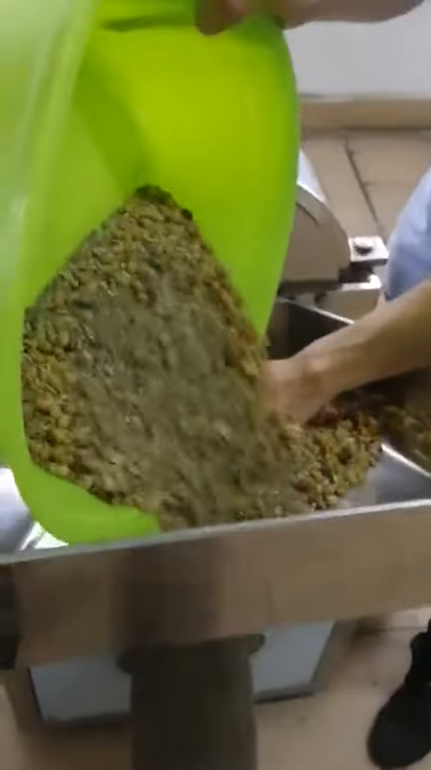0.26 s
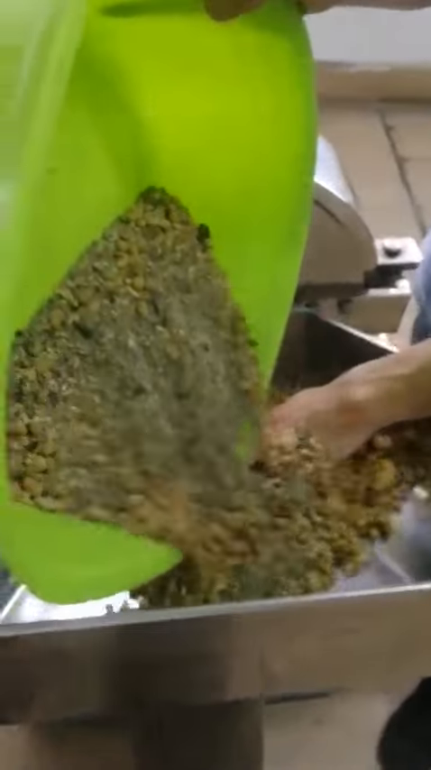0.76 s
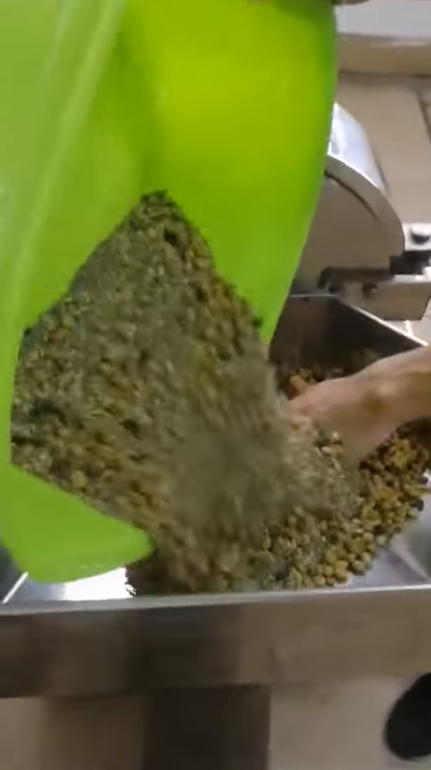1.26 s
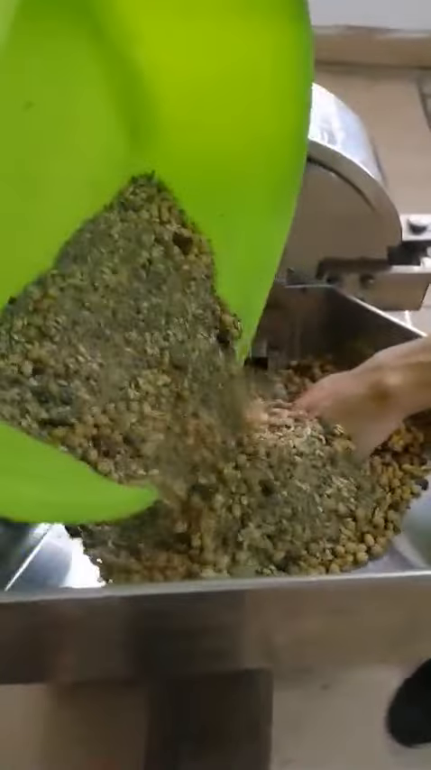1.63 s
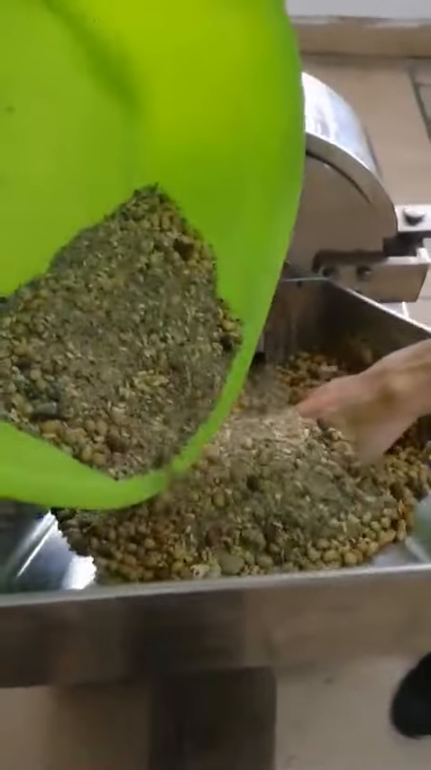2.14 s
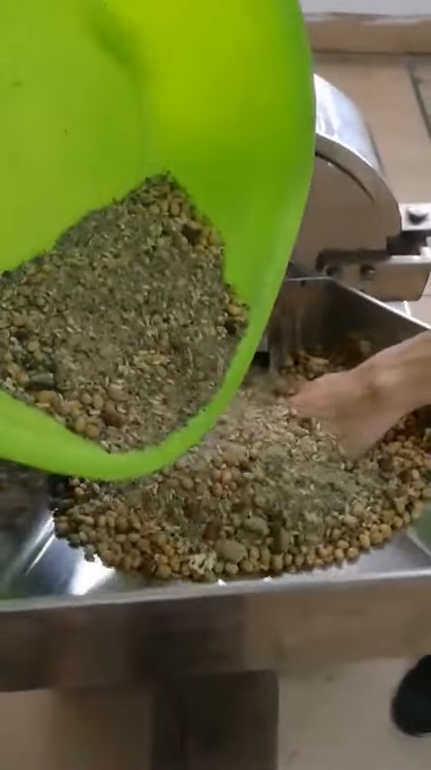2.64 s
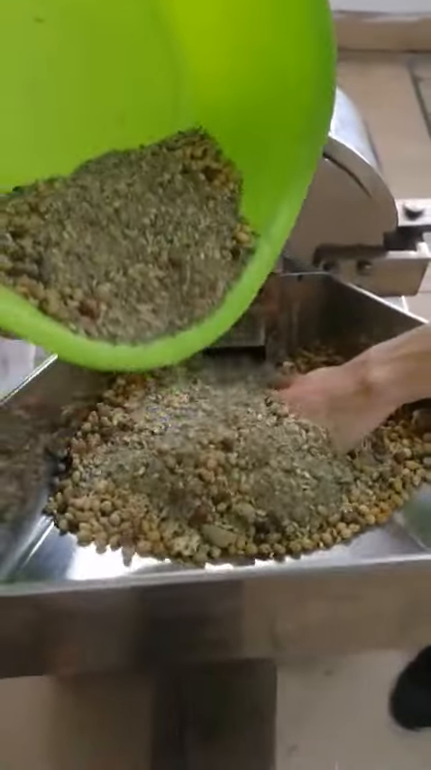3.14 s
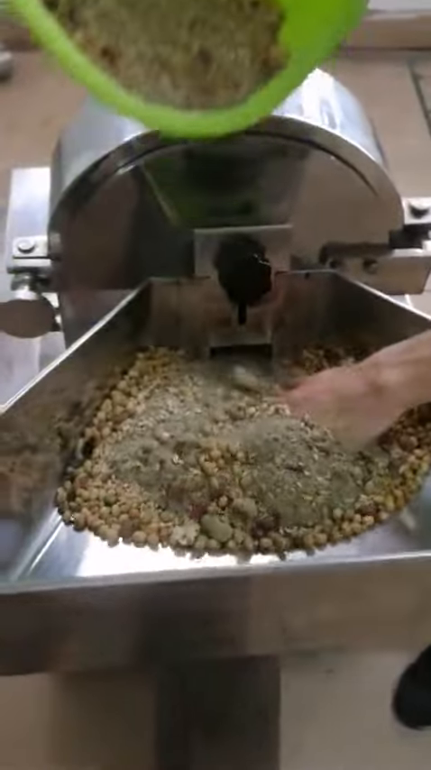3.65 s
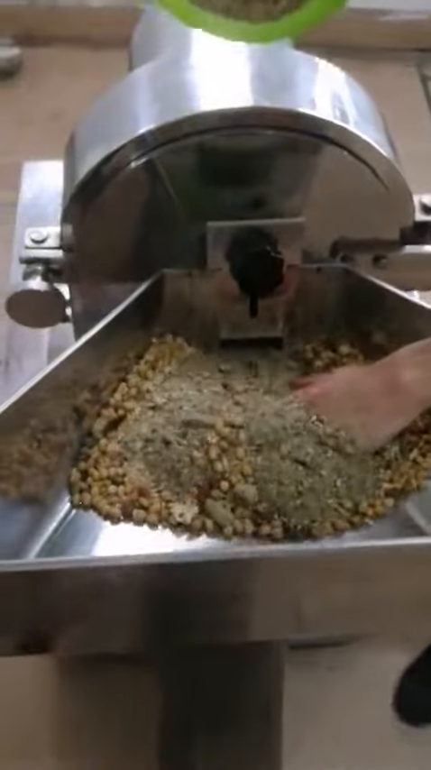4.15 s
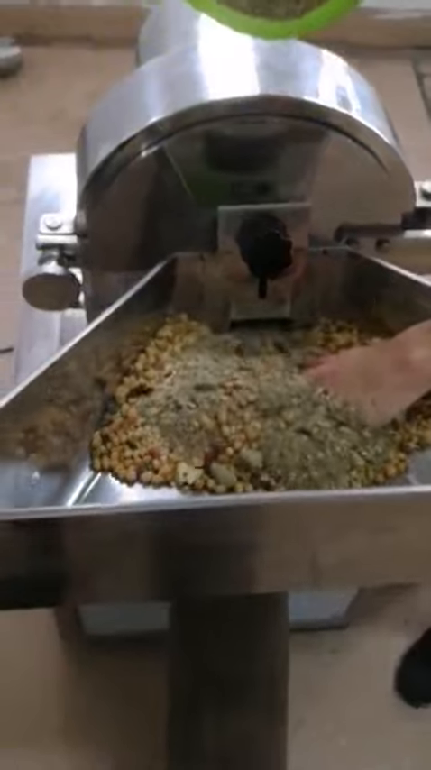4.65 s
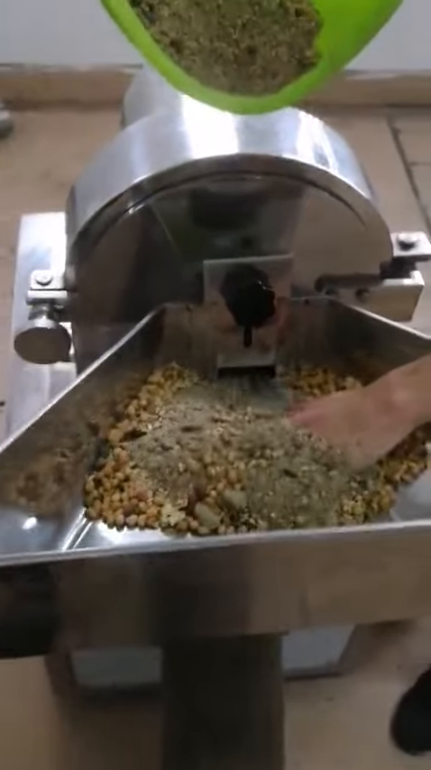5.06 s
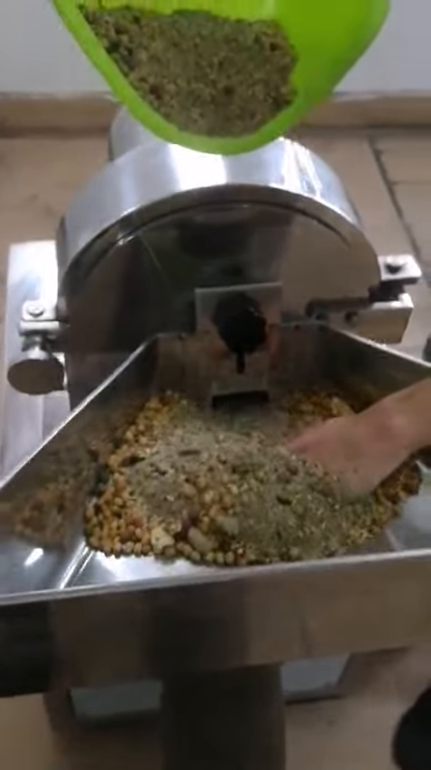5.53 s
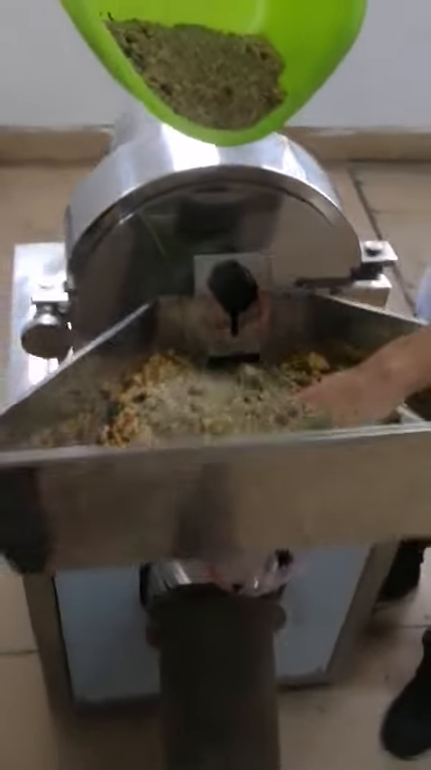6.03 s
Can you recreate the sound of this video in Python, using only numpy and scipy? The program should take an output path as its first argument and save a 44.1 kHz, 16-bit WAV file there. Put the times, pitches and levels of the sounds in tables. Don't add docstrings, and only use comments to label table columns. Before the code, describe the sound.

A hammer mill runs throughout, close to a handheld stereo microphone in a tiled workshop. A strong, steady whine near 310 hertz dominates, over throbbing motor and belt hum and roaring air. Grain hisses and crackles brightly in uneven handfuls, with sharp snaps and small metallic ticks. After the first second the pitch sags very slightly and the grinding grows heavier, then the speed partly recovers.

```python
import sys
import numpy as np
from scipy import signal
from scipy.fft import rfft, irfft, next_fast_len
from scipy.io import wavfile
from scipy.ndimage import uniform_filter1d, map_coordinates

SR = 44100
rng = np.random.default_rng(int(sys.argv[2]) if len(sys.argv) > 2 else 0)


def wav_out(sig):
    wavfile.write(sys.argv[1], SR, np.round(np.clip(np.atleast_2d(sig).T, -1, 1) * 32767).astype(np.int16))


def linear_from_db(decibels):
    return 10 ** (np.asarray(decibels, float) / 20)


N = 277389

# start_s [s], speed_hz [turns/s]
ROTOR_SPEED = [(0, 77.46), (.7, 77.47), (1.2, 77.33), (1.5, 77.22), (1.8, 76.94), (2.1, 76.76),
               (2.4, 76.72), (3, 76.88), (3.89, 76.95), (4.5, 76.85), (5.09, 76.86), (5.39, 76.98),
               (6.29, 77.03)]

# order [cycles/turn], left_db [dB], right_db [dB], left_lead_rad [rad]
BEATER_TONES = [(4.0, -9.0, -10.4, -0.98), (8.0, -35.4, -41.7, 3.38), (12.0, -33.2, -38.3, -1.59),
                (16.0, -35.4, -33.0, 0.49), (20.0, -27.6, -31.8, 0.27), (24.0, -37.8, -37.0, -0.45),
                (28.0, -43.3, -49.7, 2.35)]
WALL_ECHOES = [(1.029, 0.236, 0.236), (0.845, 0.085, 0.254), (0.585, 0.233, 0.129), (0.418, 0.182, 0.263),
               (0.534, 0.206, 0.156), (0.557, 0.059, 0.12), (0.64, 0.185, 0.332)]
FLOOR_ECHOES = [(0.377, 0.183, 0.185), (0.617, 0.541, 0.715), (0.413, 0.516, 0.083), (0.238, 0.307, 0.363),
                (0.347, 0.605, 0.11), (0.852, 0.76, 0.302), (0.186, 0.647, 0.239)]
# start_s [s], wall_detour_m [m], floor_detour_change_m [m]
HAND_DRIFT = [(0.0, 1.824, -0.132), (0.42, 1.848, -0.204), (0.84, 1.885, -0.227), (1.26, 1.897, -0.208),
              (1.68, 1.921, -0.242), (2.1, 1.945, -0.417), (2.52, 1.953, -0.409), (2.94, 1.953, -0.35),
              (3.35, 1.93, -0.505), (3.77, 1.924, -0.493), (4.19, 1.935, -0.509), (4.61, 1.954, -0.486),
              (5.03, 1.968, -0.489), (5.45, 1.945, -0.505), (5.87, 1.963, -0.539), (6.29, 1.973, -0.57)]
SOUND_M_PER_TURN = 343 / 77
WHINE_RISE_DB = 0.04

# order [cycles/turn], start_turns [turns], over_pair_db [dB]
BOOM_TONES = [(1.93675, -.40, 0), (1.9431, .01, 0), (1.9685, -.49, -8), (1.7756, -.33, -7),
              (1.7462, .43, -11), (2.135, -.4, -8), (2.1634, .48, -11)]
# start_s [s], second_order_db [dB], path_shift_turns [turns], motor_belt_db [dB]
BOOM_SWELL = [(0, -28, -0.045, -31.5), (1.2, -27.5, 0.21, -34), (1.9, -25.5, -0.0067, -40),
              (2.5, -21.5, -0.094, -32), (4, -25, 0.061, -33), (5.2, -23, 0.0099, -33.5),
              (6.29, -26, -0.18, -45)]
DRIVE_ORDERS = [.6455, .699, .7756, 1, 1.36, 1.392, 1.551, 2.324, 3, 3.19, 3.293, 3.74, 5, 6, 6.166, 6.193,
                6.224, 7, 9, 17.879, 32, 36]
# left_db [dB], right_db [dB], left_lead_rad [rad]
DRIVE_LEVELS = [(-55, -55, 0), (-44, -44, 0), (-51, -52, .1), (-38, -38, .1), (-45, -45, .2),
                (-47, -47, .2), (-48, -48, .2), (-44, -46, .3), (-35, -36, .2), (-48, -48, .1),
                (-48, -49, .1), (-50, -45, -.3), (-41, -39, .2), (-32.5, -36.5, 1.5), (-44, -51, -.9),
                (-43, -53, -2), (-44, -54, -.8), (-43, -44, 2.4), (-53, -47, 2.3), (-43, -43, .8),
                (-46, -51, 2.5), (-50, -52, 1)]

# pitch_hz [Hz], level_db [dB/Hz]
ROAR_COLOUR = [(20, -31), (40, -12), (100, -6), (150, 3.5), (210, -5.5), (290, -1), (480, -3), (750, -8.5),
               (1400, -7.5), (2000, -16), (2450, -17), (2770, -15), (3200, -25.5), (4200, -19.5),
               (9000, -27)]
# start_s [s], level_db [dB]
ROAR_LEVEL = [(0, -34.5), (6.29, -35.5)]
# pitch_hz [Hz], likeness [0 to 1]
ROAR_LIKENESS = [(25, .995), (60, .99), (150, .95), (250, .85), (450, .5), (700, .3), (1400, .45),
                 (3000, .3)]
# pitch_hz [Hz], left_lead_rad [rad]
ROAR_LEAD = [(60, 0), (150, .3), (250, .1), (400, -.8), (650, -2.5), (1200, 0)]

# start_s [s], flow_db [dB]
GRAIN_FEED = [(0, -28), (.1, -25.5), (.37, -30.5), (.62, -27.5), (1.0, -30), (1.2, -26), (1.55, -24),
              (1.7, -23), (2.4, -22.5), (2.6, -25), (3.5, -24), (3.75, -24.5), (4.4, -23), (4.55, -24),
              (4.75, -21), (5.25, -25), (5.55, -24), (6.29, -26)]
# start_s [s], peak_db [dB], t60_s [s]
HANDFULS = [(0.0228, -11.5, 0.17), (0.1845, -10.5, 0.15), (0.442, -5.5, 0.09), (0.5232, -12, 0.15),
            (0.5756, -11.5, 0.21), (0.8395, -9.5, 0.18), (1.048, -6, 0.16), (1.1558, -12.5, 0.35),
            (1.1904, -6.5, 0.14), (1.2194, -13, 0.13), (1.6132, -7.5, 0.27), (1.8054, -4.5, 0.12),
            (1.9874, -5.5, 0.15), (2.0772, -9, 0.15), (2.4598, -10, 0.33), (2.8574, -9, 0.15),
            (3.4594, -11, 0.17), (3.7714, -13, 0.15), (3.8836, -4.5, 0.1), (4.121, -3.5, 0.13),
            (4.1889, -7.5, 0.14), (4.2363, -5, 0.067), (4.3465, -8, 0.19), (4.6673, -10, 0.17),
            (4.793, -6, 0.15), (4.8489, -9.5, 0.15), (5.0064, -7.5, 0.25), (5.7618, -16.5, 0.15),
            (6.039, -5.5, 0.1), (6.2238, -9.5, 0.22)]
# start_s [s], peak_db [dB]
SNAPS = [(0.4694, -18), (0.6479, -10.5), (0.8794, -19), (1.4406, -14), (2.0974, -7), (2.1814, -15),
         (3.1294, -9), (3.6194, -5.5), (3.69, -9), (3.8312, -10), (3.9274, -12), (4.0094, -12),
         (4.4094, -4.5), (5.2714, -17), (5.2954, -10), (5.4131, -16), (5.5434, -5), (5.6291, -16),
         (6.112, -11), (6.1419, -9)]
# pitch_hz [Hz], width_hz [Hz], level_db [dB]
CASING_RINGS = [(6525, 60, 7), (7265, 50, 5), (7950, 200, 4), (8620, 100, 3), (8870, 60, 4), (9300, 150, 1),
                (11850, 80, 5), (12480, 250, 3), (13510, 130, 10)]
# pitch_hz [Hz], level_db [dB]
PORT_LEFT = [(1500, -21.5), (3000, -9.5), (5000, -10), (6500, -6.5), (7600, 0), (8300, 1.5), (9400, -0.5),
             (10500, -10.5), (12500, -24), (15100, -19), (15600, -36)]
# pitch_hz [Hz], level_db [dB]
PORT_RIGHT = [(1500, -20.5), (3000, -13), (5000, -11.5), (6500, -6), (8000, -6), (9500, -7), (11000, -8.5),
              (12500, -9), (14000, -8), (15100, -14), (15600, -18)]
# pitch_hz [Hz], t60_s [s]
SHOP_DECAY = [(300, .5), (3000, 1), (12000, 0.43)]
FEED_PAN_DB, HANDFUL_PAN_DB = 7, 5.5
HANDFUL_DB, HANDFUL_ATTACK_S, HANDFUL_TOP_HZ = -10.5, 0.0017, 12500
SNAP_T60_S = 0.062

# start_s [s], peak_db [dB]
HOPPER_PINGS = [(0.2488, -12), (0.4314, -16), (1.046, -22), (1.0784, -16), (1.2286, -19), (1.3483, -16),
                (1.4436, -19), (2.0742, -19), (2.1415, -16), (4.8499, -18), (5.0075, -18), (5.4211, -19)]


def unit(x):
    return x / np.sqrt(np.mean(x ** 2) + 1e-20)


def along(points, hz):
    f, v = np.transpose(points)
    return np.interp(np.log(hz + 1), np.log(f + 1), v)


def curves(rows):
    s, *cols = np.transpose(rows)
    t = np.arange(N) / SR
    return np.array([np.interp(t, s, c) for c in cols])


def wobble(rate):
    knots = rng.standard_normal(int(N * 400 / SR))
    return map_coordinates(knots, [np.arange(N) * rate / SR], order=1)


def filtered(x, response):
    m = next_fast_len(N + SR // 2)
    spectrum = rfft(x, m) * response(np.fft.rfftfreq(m, 1 / SR))
    return irfft(spectrum, m)[..., :N]


def tone(turns, left_db, right_db, lead):
    angle = 2 * np.pi * turns
    left = linear_from_db(left_db) * np.cos(angle)
    right = linear_from_db(right_db) * np.cos(angle - lead)
    return np.sqrt(2) * np.array([left, right])


def whine(turns):
    out = np.zeros((2, N))
    detours = curves(HAND_DRIFT) / SOUND_M_PER_TURN
    for (k, left_db, right_db, lead), *echoes in zip(BEATER_TONES, WALL_ECHOES, FLOOR_ECHOES):
        paths = 1
        for (share, *head_start), detour in zip(echoes, detours):
            cycles = np.c_[head_start] - k * detour
            paths = paths + share * np.exp(2j * np.pi * cycles)
        flicker = np.array([wobble(14), wobble(14)])
        flicker_db = WHINE_RISE_DB * k + (.5 + .07 * k) * flicker
        flip = .5 * (k == 4)
        phase = k * (turns + .025) + flip + .002 * k * wobble(14)
        lag = np.angle(paths[0] / paths[1])
        out += linear_from_db(flicker_db) * np.abs(paths) * tone(phase, left_db, right_db, lead + lag)
    return out


def drive(turns):
    rotor_db, shift, motor_db = curves(BOOM_SWELL)
    out = tone(2 * turns + shift, rotor_db, rotor_db, lead=.35)
    for k, start, db in BOOM_TONES:
        out += tone(k * turns + start, motor_db + db, motor_db + db, lead=0.38)
    for k, (left_db, right_db, lead) in zip(DRIVE_ORDERS, DRIVE_LEVELS):
        unsteady = linear_from_db(1.5 * wobble(1.3))
        out += unsteady * tone(k * turns + rng.random(), left_db, right_db, lead)
    return out


def roar(turns):
    puff = 1 + 0.05 * np.cos(2 * np.pi * 4 * turns)
    pair = rng.standard_normal((2, N)) * puff * linear_from_db(.5 * wobble(6))

    def colour(hz):
        spread = np.arccos(np.clip(along(ROAR_LIKENESS, hz), -1, 1)) / 2
        return linear_from_db(along(ROAR_COLOUR, hz)) * np.array([np.cos(spread), np.sin(spread)])

    def lead(hz):
        return np.exp(.5j * along(ROAR_LEAD, hz) * np.array([[1], [-1]]))

    mid, side = filtered(pair, colour)
    both = filtered(np.array([mid + side, mid - side]), lead)
    balance_db = np.array([[.8], [-.8]])
    return linear_from_db(curves(ROAR_LEVEL)[0] + 10) * unit(both) * linear_from_db(balance_db)


def bursts(events, attack_s, length):
    t = np.arange(length) / SR
    swell = np.zeros(N + length)
    for s, db, t60 in events:
        swell[round(s * SR):][:length] += linear_from_db(db - 60 * t / t60) * (1 - np.exp(-t / attack_s))
    return swell[:N]


def patchy(x, depth_db):
    z = signal.stft(x, nperseg=256)[2]
    field = rng.standard_normal(z.shape[1:])
    field = uniform_filter1d(field, size=9, axis=0)
    field = uniform_filter1d(field, size=14, axis=1)
    return signal.istft(z * linear_from_db(depth_db * unit(field)), nperseg=256)[1][:, :N]


def shop(x):
    hz, t, z = signal.stft(rng.standard_normal((2, SR // 2)), SR, nperseg=256)
    decay = linear_from_db(-60 * t / along(SHOP_DECAY, hz)[:, None])
    tail = signal.istft(z * decay, SR, nperseg=256)[1]
    return signal.fftconvolve(x, tail / np.linalg.norm(tail[0]), axes=1)[:, :N]


def casing(hz):
    ring = 0
    for c, w, db in CASING_RINGS:
        ring = ring + linear_from_db(db) * 1j * hz * w / (c * c - hz * hz + 1j * hz * w)
    return 1 + ring / 2


def ports(hz):
    colour_db = np.array([along(PORT_LEFT, hz), along(PORT_RIGHT, hz)])
    delay_s = np.array([[.0006], [0]])
    return linear_from_db(colour_db) * np.exp(-2j * np.pi * hz * delay_s)


def kernels():
    side = np.array([[.5], [-.5]])
    feed_db = curves(GRAIN_FEED)[0] - 1.5
    clumps = linear_from_db(.7 * wobble(35) + 1.4 * wobble(90) + 1.3 * wobble(240))
    shared, *own = rng.standard_normal((3, N))
    cracks = unit(clumps * (0.76 * shared + np.array(own))) * linear_from_db(feed_db + side * FEED_PAN_DB)
    hits = HANDFULS + [(s, db, SNAP_T60_S) for s, db in SNAPS]
    swell = linear_from_db(HANDFUL_DB) * bursts(hits, HANDFUL_ATTACK_S, SR // 4)
    dull = filtered(rng.standard_normal((2, N)), lambda hz: 1 / (1 + (hz / HANDFUL_TOP_HZ) ** 6) ** .5)
    cracks = cracks + np.sqrt(clumps) * swell * dull * linear_from_db(side * HANDFUL_PAN_DB)
    cracks = patchy(cracks, depth_db=1.4)
    cracks = cracks + linear_from_db(-5.0) * shop(cracks)
    return linear_from_db(9.5 - side * 5.5) * filtered(cracks, lambda hz: casing(hz) * ports(hz))


def pings():
    swell = bursts([(s, db - 9, 0.06) for s, db in HOPPER_PINGS], 0.002, SR // 20)
    bright = [(8000, -39), (11000, 7), (15000, 12)]  # (Hz, dB)
    ticks = filtered(swell * rng.standard_normal(N), lambda hz: linear_from_db(along(bright, hz)))
    return ticks * linear_from_db(np.array([[-10], [3]]))


def scene():
    turns = np.cumsum(curves(ROTOR_SPEED)[0]) / SR
    return whine(turns) + drive(turns) + roar(turns) + kernels() + pings()


def starved(x, from_hz, under_db):
    hz, _, z = signal.stft(x, SR, nperseg=2048)
    power = (np.abs(z[:1024]).reshape(64, 16, -1) ** 2).mean(axis=1)
    centre = hz[:1024].reshape(64, 16).mean(axis=1)[:, None]
    slack_db = under_db * (14300 - centre) / 2500
    threshold = linear_from_db(-2 * slack_db) * uniform_filter1d(power, size=30, axis=1)
    keep = (centre < from_hz) | (power > threshold)
    z[:1024] *= np.repeat(keep, 16, axis=0)
    return signal.istft(z, SR, nperseg=2048)[1][:N]


def top_cut(x):
    return signal.sosfilt(signal.butter(12, 15550, fs=SR, output="sos"), x)


def record(dry):
    dry = dry / (1 + np.abs(dry / .95) ** 8) ** (1 / 8)
    left = starved(dry[0], from_hz=11000, under_db=2.5)
    return top_cut(np.array([left, dry[1]]))


dry = scene()
out = record(dry)
wav_out(out)
```